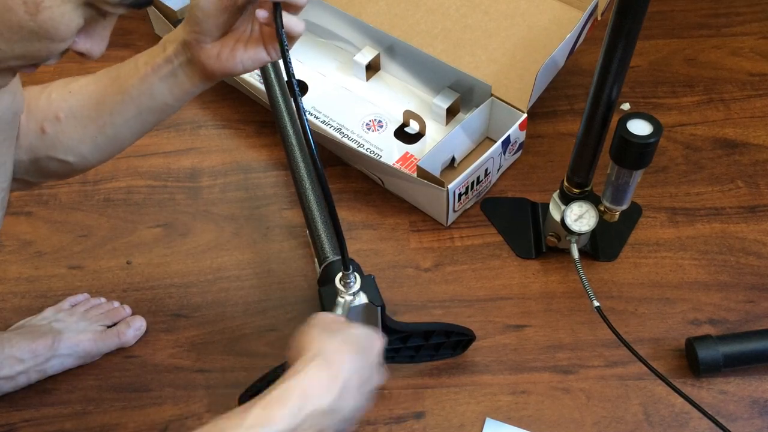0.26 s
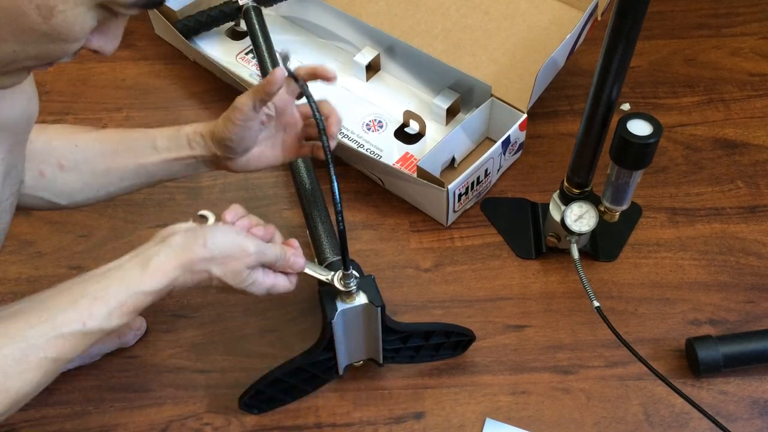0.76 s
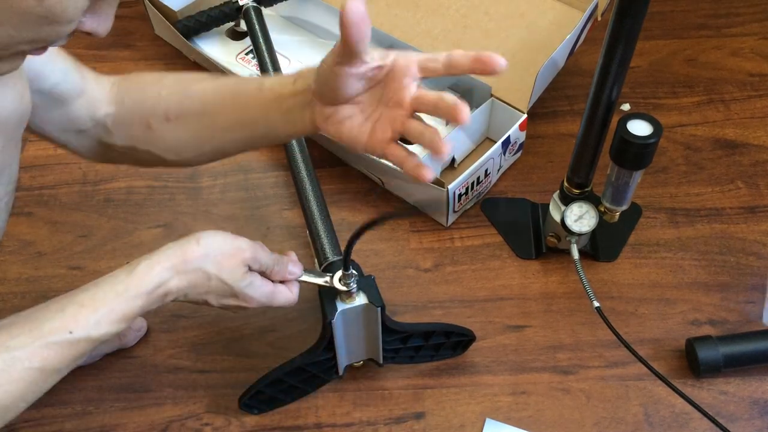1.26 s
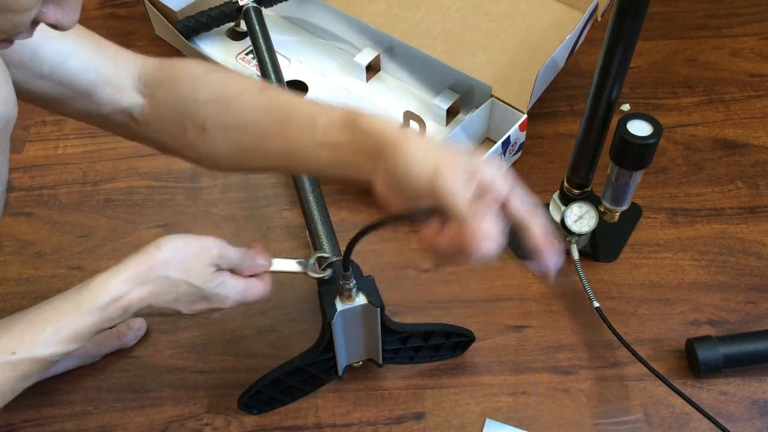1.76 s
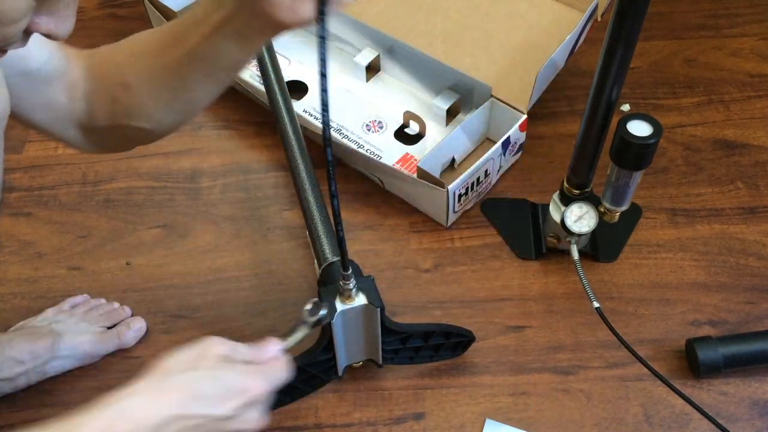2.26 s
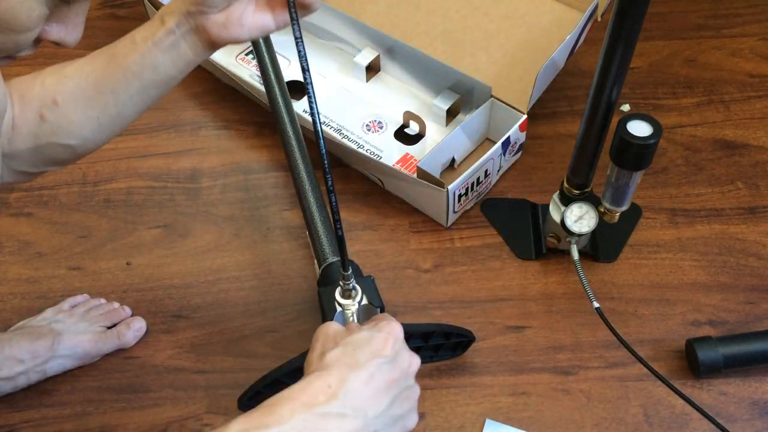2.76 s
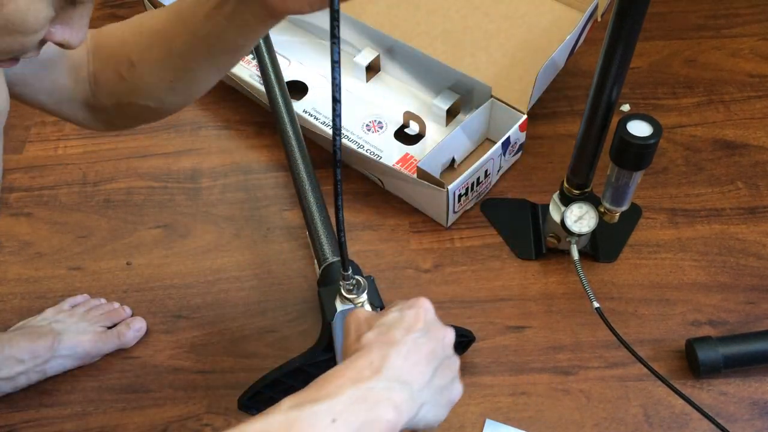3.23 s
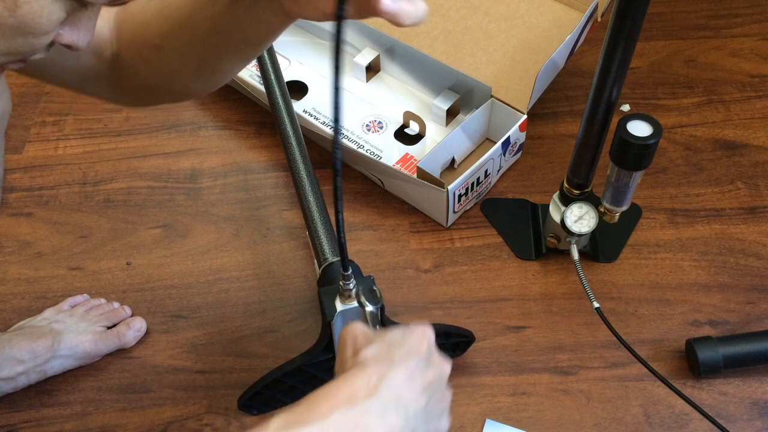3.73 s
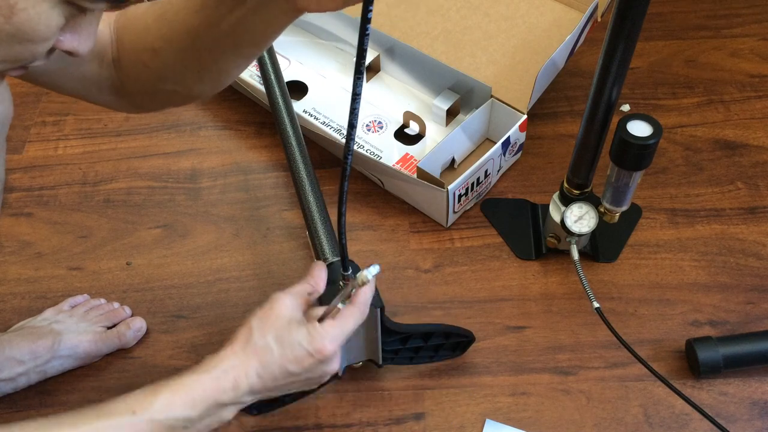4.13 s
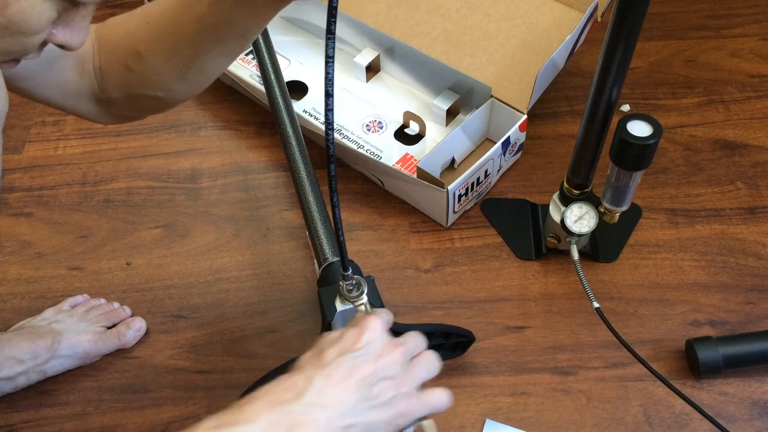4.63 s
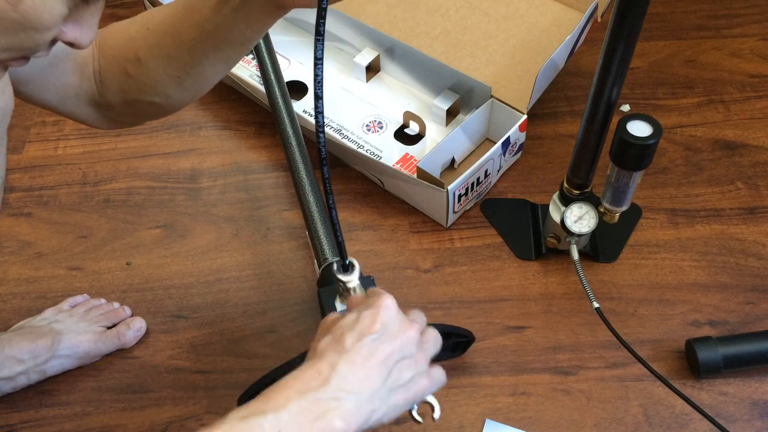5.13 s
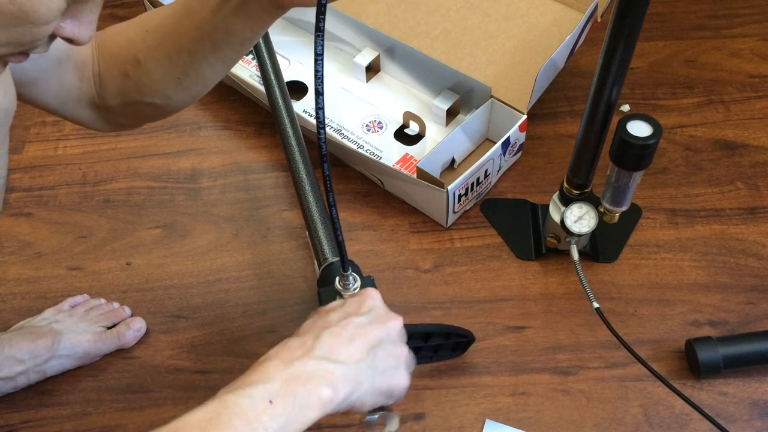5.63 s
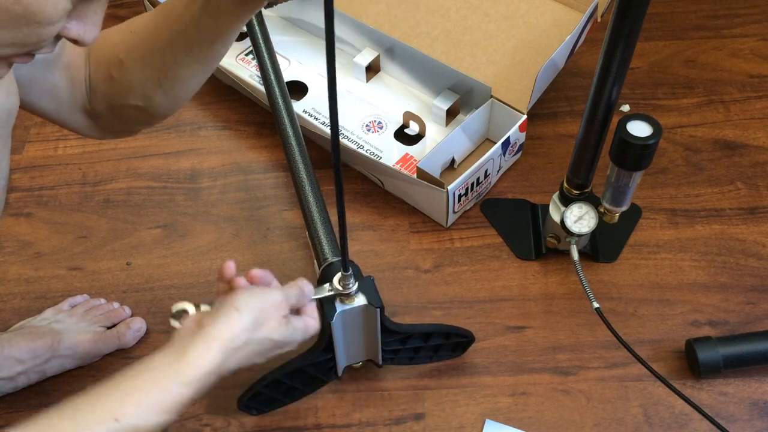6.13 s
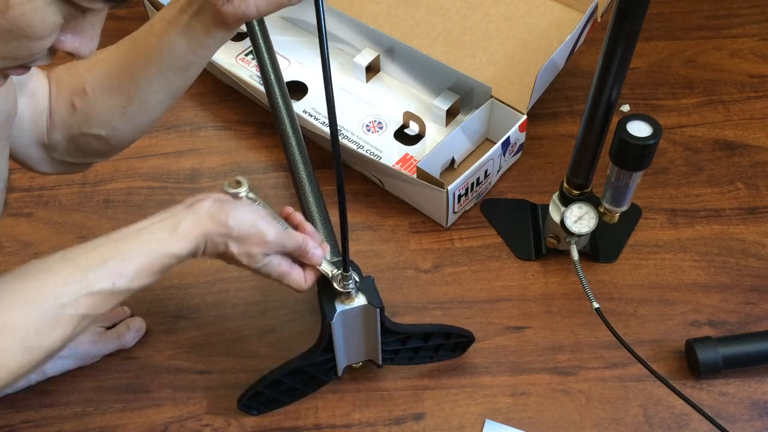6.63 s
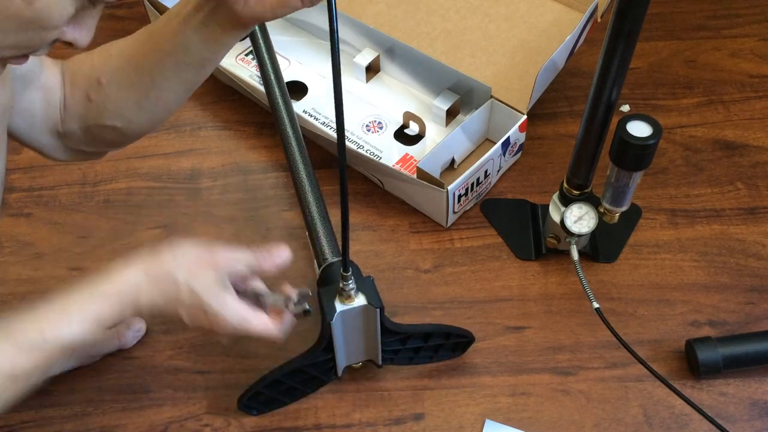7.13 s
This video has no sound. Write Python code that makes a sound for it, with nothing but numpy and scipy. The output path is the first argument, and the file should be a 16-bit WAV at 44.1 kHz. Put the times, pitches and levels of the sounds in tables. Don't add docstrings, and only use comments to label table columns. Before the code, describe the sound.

Close, dry metal handling indoors: a wrench seats and drags on a steel fitting, each contact a short crack with a thin high ring, a dull pump-base knock and a soft board thump. Early on, one heavy hose end smacks the floor and clatters briefly. Pauses hold only tiny finger and hose ticks over quiet room rumble, faint hum and microphone hiss. Clacks crowd together later, then a final quick chatter.

```python
import sys
import numpy as np
from scipy import signal
from scipy.fft import rfft, irfft
from scipy.io import wavfile
from scipy.ndimage import uniform_filter1d

SR = 44100
rng = np.random.default_rng(int(sys.argv[2]) if len(sys.argv) > 2 else 0)


def unload_wav(signal):
    wavfile.write(
        sys.argv[1],
        SR,
        np.round(np.clip(np.atleast_2d(signal).T, -1, 1) * 32767).astype(np.int16),
    )


def how_loud(loudness_db):
    steps = np.asarray(loudness_db, float) / 20
    return 10 ** steps


N = 325458

# frequency in Hz, level in dB, t60 in seconds.
NUT_MODES = [(2500, -1, .012), (3000, 0, .016), (3650, -1, .012), (4400, -2, .014), (5050, -2, .012),
             (6050, -3, .01)]
# frequency in Hz, level in dB, t60 in seconds.
BASE_MODES = [(340, -3, .05), (470, -7, .04), (587, -8, .045), (730, -11, .035), (885, -3, .04),
              (935, -5, .04), (1022, -4, .12), (1190, -5, .05), (1400, -8, .025), (1620, -10, .03),
              (2000, -12, .03)]


def band(x, lo_hz, hi_hz):
    sos = signal.butter(2, [lo_hz, min(hi_hz, .45 * SR)], "band", fs=SR, output="sos")
    return signal.sosfilt(sos, x)


def hiss(lo_hz, hi_hz):
    return band(rng.standard_normal(N), lo_hz, hi_hz)


def train(s, size):
    return np.bincount((np.asarray(s) * SR).astype(int), size, N)[:N]


def fade(x, s):
    fall, rise = np.exp(-1 / (s * SR)), np.exp(-5 / (s * SR))
    dying = signal.lfilter([1], [1, -fall], x)
    return 1.5 * signal.lfilter([1 - rise], [1, -rise], dying)


def ring(s, db, modes, spread_db, detune, push_s):
    hz, mode_db, t60 = np.transpose(modes)[:, :, None]
    out = np.zeros(N + SR)
    t = np.arange(int(1.2 * t60.max() * SR)) / SR
    swell = np.sin(np.pi / 2 * np.clip(t / push_s, 0, 1)) ** 2
    shifts = rng.standard_normal((len(s), 3, len(modes), 1))
    for at, blow_db, (weight, pitch, damping) in zip(s, db, shifts):
        decay = np.exp(-np.log(1000) * t / (t60 * np.exp(0.082 * damping)))
        tone = np.sin(2 * np.pi * hz * (1 + detune * pitch) * t) * decay
        level = how_loud(blow_db + mode_db + spread_db * weight) * np.sign(pitch)
        out[int(at * SR):][:len(t)] += swell * (level * tone).sum(axis=0)
    return out[:N]


def walk(rate):
    k = int(SR / rate)
    held = np.repeat(rng.standard_normal(N // k + 1), k)
    return 1.5 * uniform_filter1d(uniform_filter1d(held, k), k)[:N]


def wrench():
    # start in seconds, crack level in dB, treble bite in dB.
    clacks = [(0.0393, -71, -70.5), (0.0743, -38, -53), (0.0847, -74, -39.5), (1.027, -58.5, -86),
              (2.7166, -24.5, -31), (2.7375, -63, -37.5), (2.9543, -36, -56), (2.959, -34.5, -45.5),
              (3.238, -43.5, -61.5), (3.3234, -31.5, -51.5), (3.6972, -61.5, -71.5), (4.7086, -26.5, -39.5),
              (4.7321, -47, -65), (4.7694, -31, -55), (4.9047, -39.5, -56.5), (5.0821, -34, -47),
              (5.1083, -39, -42.5), (5.1791, -46, -49), (5.1994, -42.5, -51), (5.2785, -25, -64),
              (5.2995, -34, -62), (5.3272, -26.5, -62), (5.3645, -21.5, -31.5), (5.3705, -26, -34),
              (5.5045, -33.5, -45), (6.891, -48, -63), (6.9095, -32.5, -34.5), (6.9373, -33.5, -41),
              (6.9608, -40, -31), (6.9902, -30.5, -40.5)]
    s, crack_db, bite_db = np.transpose(clacks)
    crack = fade(train(s, how_loud(crack_db - 8.5)), 0.0057) * hiss(1770, 6000)
    bite = fade(train(s, how_loud(bite_db + 3.5)), .0025) * band(hiss(6000, 13300), 5000, 13300)
    clack = ring(s, crack_db - 10.5, NUT_MODES, spread_db=4, detune=0.03, push_s=.0005)
    return crack + bite + clack


def steel():
    # start in seconds, then shaft, ring end and jaws in dB.
    clinks = [(0.086, -68, -68, -55), (1.703, -88, -73.5, -76), (2.716, -64, -58, -51),
              (2.874, -77, -66, -85), (2.961, -62, -65, -61), (3.322, -55, -74, -87),
              (3.699, -89.5, -72.5, -99), (4.709, -50.5, -51, -47.5), (4.772, -58.5, -79, -75),
              (4.904, -65, -80, -94), (5.083, -78.5, -64, -59), (5.108, -77, -50.5, -52),
              (5.2, -74, -69, -72), (5.279, -80, -68, -58), (5.328, -83, -62, -66.5),
              (5.365, -43, -51, -50.5), (6.909, -59, -47.5, -46), (6.94, -47, -67, -45),
              (6.963, -46.5, -54, -50)]
    # frequency in Hz, level in dB, t60 in seconds.
    families = [
        [(7335, -2, .09), (7400, -5, .12), (7270, -6, .07), (4370, -7, .07), (4455, -8, .11), (4520, -10, .06),
         (2995, -12, .04), (3700, -13, .06), (2600, -8, .08), (2150, -11, .06)],
        [(9630, 0, .09), (9680, -8, .14)],
        [(11552, 0, .13), (11610, -6, .08), (11760, -9, .06), (5442, -8, .11)],
        [(12530, 0, .06), (12600, -5, .05)],
        [(13230, 0, .11), (13500, -8, .05), (15210, -8, .12)],
    ]
    s, shaft_db, end_db, jaws_db = np.transpose(clinks)
    hard_db = -49.5
    low_db = hard_db - 0.5 + 1.8 * (end_db - hard_db)
    rings = 0
    for db, modes in zip((shaft_db, low_db, end_db, jaws_db, jaws_db), families):
        rings = rings + ring(s, db + 7, modes, spread_db=2.0, detune=0.0015, push_s=0.00045)
    return how_loud(3.5 * walk(110)) * rings


def pump():
    # start in seconds, base knock in dB, board thump in dB.
    knocks = [(0.0141, -53.5, -44.5), (0.0408, -43, -40.5), (.084, -37, -33.5), (0.2521, -54.5, -53.5),
              (1.013, -53, -65.5), (1.027, -54, -62.5), (2.7158, -33.5, -32), (2.7376, -40.5, -28),
              (2.9574, -37.5, -36.5), (3.238, -43.5, -36), (3.3233, -53, -75), (4.7088, -37, -41),
              (4.7322, -39.5, -40), (4.904, -55.5, -75), (5.0834, -45.5, -34), (5.1083, -52, -39.5),
              (5.18, -57.5, -56), (5.1989, -46, -49), (5.2792, -33.5, -31.5), (5.2994, -35, -25.5),
              (5.3281, -38.5, -33.5), (5.366, -34, -30), (5.5042, -38.5, -31.5), (5.5938, -50.5, -72),
              (6.8678, -42.5, -49), (6.891, -40.5, -42), (6.9087, -35, -42), (6.9376, -36, -39),
              (6.9607, -32, -32), (6.9884, -39.5, -50)]
    # start in seconds, level in dB.
    leans = [(0.0407, -41.5), (0.0862, -42.5), (1.51, -41), (1.529, -43), (2.959, -62), (3.237, -57),
             (4.7321, -44.5), (5.1083, -56.5), (5.1996, -48), (5.2986, -44), (5.3695, -53), (5.505, -33.5),
             (5.5937, -65), (6.9089, -57)]
    # frequency in Hz, level in dB, t60 in seconds.
    boards = [(179, 0, .17), (291, -10, .12), (340, -10, .05), (1022, -11, .14)]
    # frequency in Hz, level in dB, t60 in seconds.
    joists = [(68, -8, .2), (108, 0, .25)]
    s, knock_db, thump_db = np.transpose(knocks)
    knock = ring(s, knock_db - 2, BASE_MODES, spread_db=2.0, detune=0.0033, push_s=0.0013)
    rattle = fade(train(s, how_loud(knock_db + 4)), 0.00705) * hiss(650, 1844)
    thump = ring(s, thump_db - 1.5, boards, spread_db=1.5, detune=.004, push_s=.012)
    s, lean_db = np.transpose(leans)
    sag = ring(s, lean_db - 4.0, joists, spread_db=2.0, detune=0.015, push_s=.025)
    return knock + rattle + thump + sag


def scrape():
    # time in seconds, level in dB.
    drags = [
        [(0.0, -50.5), (0.068, -53.5), (0.074, -53), (0.088, -40.5), (0.1, -66.5)],
        [(1.5, -51.5), (1.75, -56), (1.85, -62.5)],
        [(5.06, -88.5), (5.082, -61), (5.272, -54), (5.276, -82), (5.334, -49), (5.35, -66), (5.37, -44)],
        [(6.86, -85.5), (6.866, -80), (6.966, -34.5), (7.03, -63)],
    ]
    t, drag = np.arange(N) / SR, np.zeros(N)
    for rows in drags:
        s, db = np.transpose(rows)
        drag += np.interp(t, s, how_loud(db), 0, 0)
    slips_per_s = 3500
    slips = (rng.random(N) < slips_per_s / SR) * how_loud(0.87 * rng.exponential(size=N))
    grit = drag * fade(slips, 0.00035) * rng.standard_normal(N)
    body = sum(how_loud(db) * band(grit, hz * 1.013, hz * 1.015) for hz, db, _ in [*NUT_MODES, *BASE_MODES])
    return how_loud(-13.0) * band(grit, 1240, 6600) + how_loud(-11.0) * body


def hose():
    # start in seconds, then slap, thud and crack in dB.
    slaps = [
        (1.457, -41.5, -61, -60),
        (1.479, 0, -24.5, -15.5),
        (1.752, -66.5, -38.5, -72.5),
    ]
    # frequency in Hz, level in dB, t60 in seconds.
    hose_end = [(520, -9, .04), (720, -8, .02), (915, 0, .028), (1010, -7, .025), (1140, -6, .03),
                (1260, -9, .02), (1385, -8, .02), (1540, -3, .025), (1850, -6, .025), (2300, -19, .02),
                (2750, -18, .025)]
    # frequency in Hz, level in dB, t60 in seconds.
    floor = [(112, -3, .16), (178, 0, .13), (230, -5, .1), (290, -6, .12), (347, -8, .08)]
    s, slap_db, thud_db, crack_db = np.transpose(slaps)
    crack = fade(train(s, how_loud(crack_db + 2.5)), 0.0034) * hiss(2400, 6500)
    spray = fade(train(s, how_loud(crack_db - 5.0)), 0.0035) * hiss(6000, 14000)
    smack = fade(train(s, how_loud(slap_db - 4)), .006) * hiss(700, 1800)
    hollow = ring(s, slap_db - 3, hose_end, spread_db=.1, detune=.002, push_s=.004)
    settling = fade(train(s, how_loud(crack_db - 17.5)), 0.05) * how_loud(5.0 * walk(120))
    clatter = settling * hiss(1500, 5200)
    thud = ring(s, thud_db - 0.5, floor, spread_db=2.0, detune=0.0012, push_s=0.0099)
    return crack + spray + clatter + smack + hollow + thud


def ticks():
    # start in seconds, level in dB, width as a pitch ratio.
    soft = [(.418, -66, 1.9), (0.4468, -52.5, 3.9), (0.4513, -58.5, 3.8), (.7, -56.5, 6.5),
            (2.0146, -62, 2.76), (2.0792, -50, 5.2), (2.088, -49, 2.5), (2.0926, -46.5, 2.4),
            (2.2, -63, 3.8), (2.2528, -47.5, 4.1), (2.3587, -52.5, 1.7), (2.366, -55.5, 2.3),
            (2.5276, -58.5, 2.3), (3.896, -55.5, 2.5), (4.0698, -62.5, 1.8), (5.93, -54.5, 1.74),
            (6.0435, -60.5, 1.8), (6.6967, -56.5, 2)]
    # start in seconds, level in dB, centre in Hz, width as a pitch ratio.
    snaps = [(1.597, -49.5, 9000, 3.3), (1.627, -47.5, 6500, 4.6), (1.786, -56, 11000, 1.9),
             (1.814, -56, 7000, 4.1), (2.058, -51, 9500, 4), (2.219, -58.5, 9000, 8.6),
             (2.238, -52.5, 11500, 4.2), (1.69, -48, 3000, 1.9), (1.717, -49, 3970, 1.2),
             (3.699, -50, 900, 1.8), (5.067, -54, 1300, 1.7), (5.935, -50, 1300, 1.3),
             (4.45, -62, 8920, 1.35), (5.505, -19, 12900, 1.12)]
    rows = [(s, db, 5100, 0.0034, ratio) for s, db, ratio in soft]
    rows += [(s, db, hz, 0.0031, ratio) for s, db, hz, ratio in snaps]
    out, t = np.zeros(N), np.arange(1500) / SR
    for s, db, hz, decay_s, ratio in rows:
        burst = rng.standard_normal(len(t)) * np.exp(-t / decay_s)
        out[int(s * SR):][:len(t)] += how_loud(db + 0.5) * band(burst, hz / ratio, hz * ratio)
    return out


def room(x):
    # band centre in Hz, level in dB, t60 in seconds.
    tails = [(180, -21, 1), (500, -7, 0.3), (1240.5, -14.5, .42), (3000, -16.5, 0.38), (7000, -18, .35),
             (12600, -19, 0.083)]
    t = np.arange(int(.8 * SR)) / SR
    echo = 0
    for hz, db, t60 in tails:
        tail = band(rng.standard_normal(len(t)), hz / 1.8, hz * 1.6) * np.exp(-np.log(1000) * t / t60)
        echo = echo + how_loud(db - 25) * tail / np.sqrt(t60)
    return signal.fftconvolve(x, echo * np.clip(t / 0.0078, 0, 1))[:N]


def air():
    # frequency in Hz, density in dB per Hz.
    floor_colour = [(12, -34), (20, -3.5), (158, -3), (205, -18), (642, -16.5), (1030, -27), (14700, -37.5),
                    (16000, -44.5)]
    # frequency in Hz, level in dB.
    mains = [(29, -78.5), (120, -76), (240, -80.5)]
    hz = np.fft.rfftfreq(N, 1 / SR)
    colour_hz, colour_db = np.transpose(floor_colour)
    motor_db = 11 * np.exp(-((hz - 236) / 11) ** 2)
    colour = how_loud(np.interp(np.log(hz + 1), np.log(colour_hz), colour_db) + motor_db)
    noise = irfft(rfft(rng.standard_normal(N)) * colour, N)
    noise *= how_loud(-66) / noise.std()
    flicker = 0
    for lo_hz in (41.4, 63.4, 100, 160, 261.7):
        flicker = flicker + (how_loud(4.8 * walk(9.9)) - 1) * band(noise, lo_hz, 1.6 * lo_hz)
    t = np.arange(N) / SR
    hum = sum(how_loud(db + 1.5 * walk(3.6)) * np.sin(2 * np.pi * f * t) for f, db in mains)
    return noise * how_loud(0.41 * walk(2.1)) + flicker + hum


def scene():
    close = wrench() + steel() + pump() + scrape() + hose() + ticks()
    return (close + room(close) + air())[None]


def low_pass(x):
    return signal.sosfilt(signal.butter(12, 16640, fs=SR, output="sos"), x)


def record(dry):
    headroom, top_hz = .8, 15400
    rounded = headroom * np.tanh(dry / headroom)
    top_cut = signal.ellip(8, .2, 35, top_hz, fs=SR, output="sos")
    return low_pass(signal.sosfilt(top_cut, rounded))


dry = scene()
out = record(dry)
unload_wav(out)
```